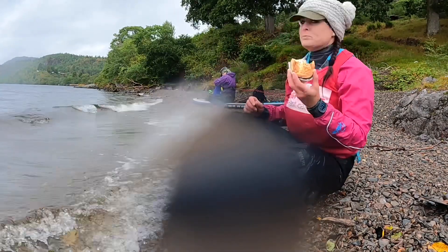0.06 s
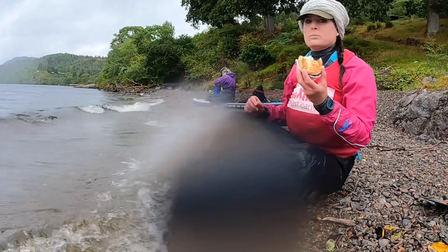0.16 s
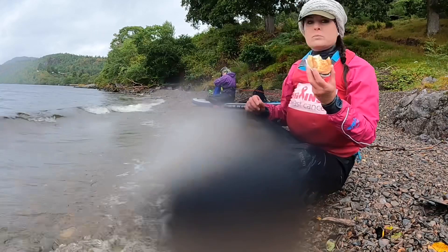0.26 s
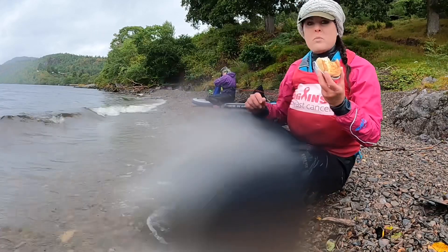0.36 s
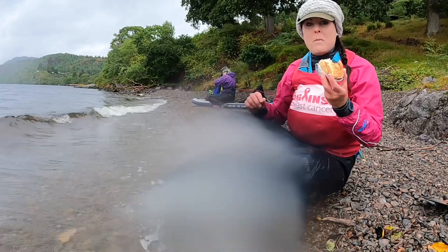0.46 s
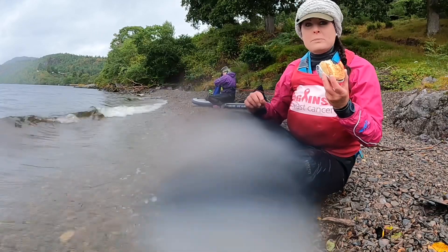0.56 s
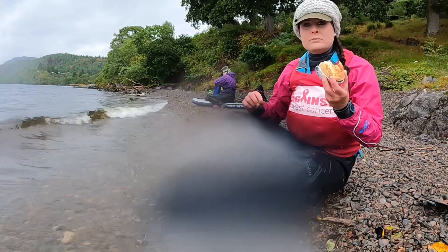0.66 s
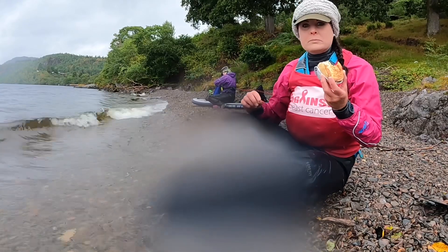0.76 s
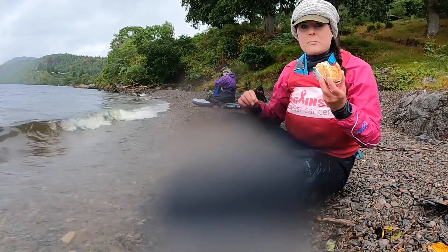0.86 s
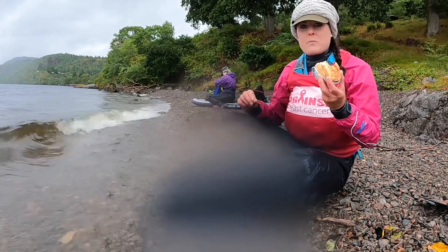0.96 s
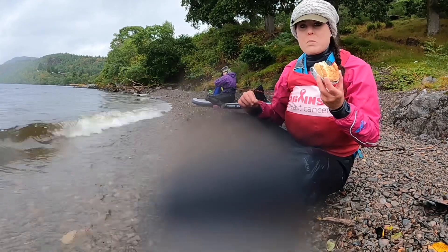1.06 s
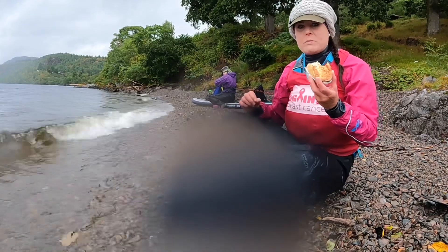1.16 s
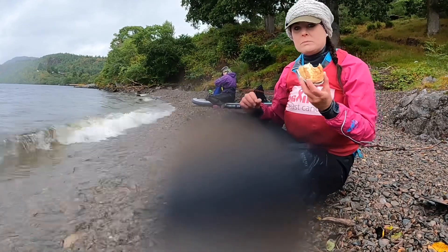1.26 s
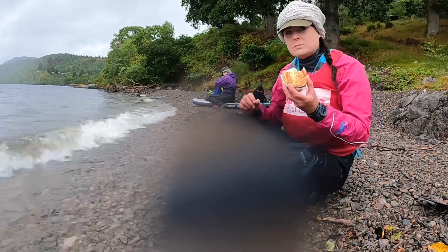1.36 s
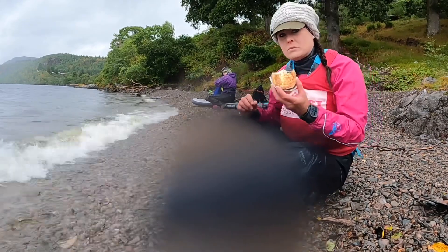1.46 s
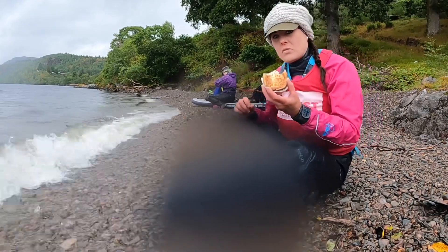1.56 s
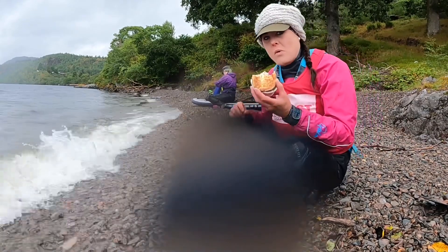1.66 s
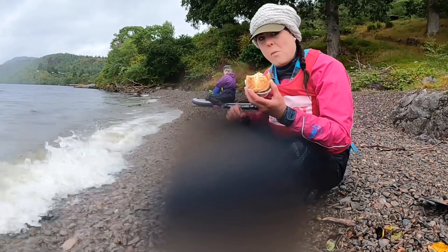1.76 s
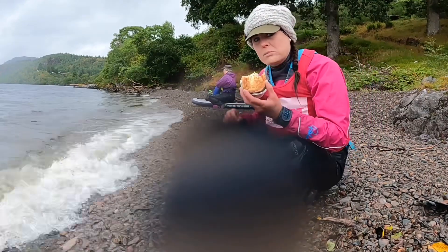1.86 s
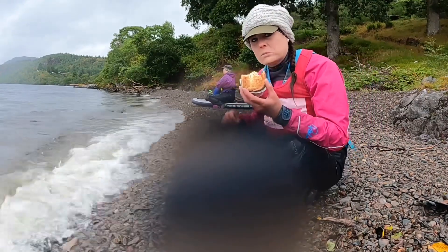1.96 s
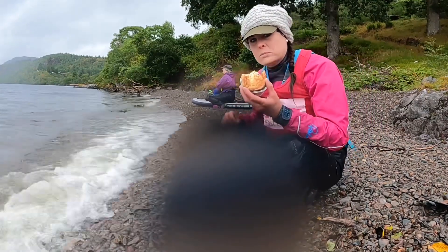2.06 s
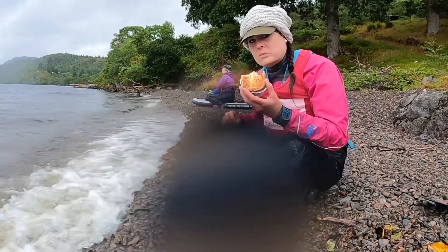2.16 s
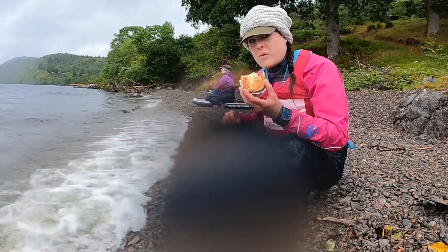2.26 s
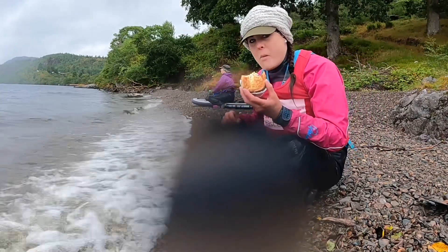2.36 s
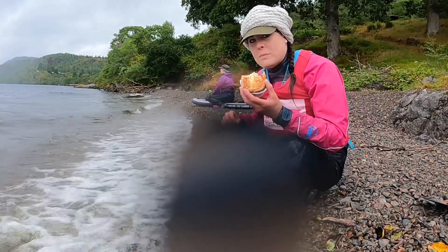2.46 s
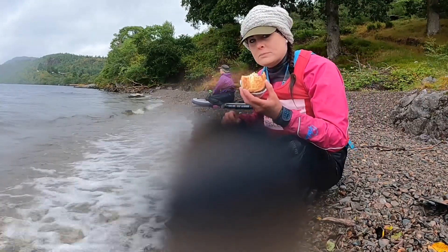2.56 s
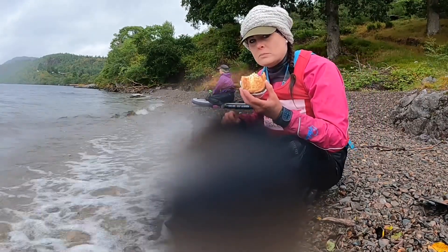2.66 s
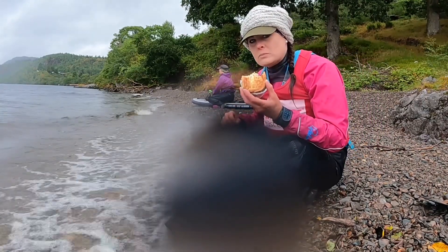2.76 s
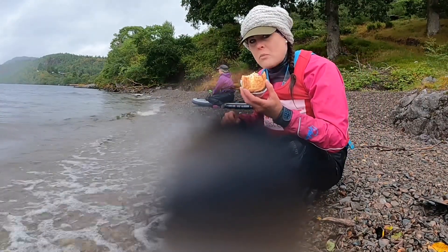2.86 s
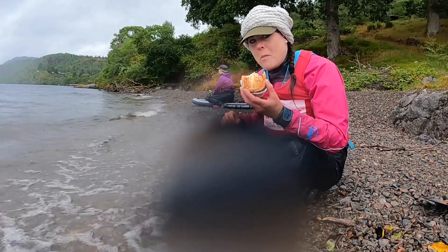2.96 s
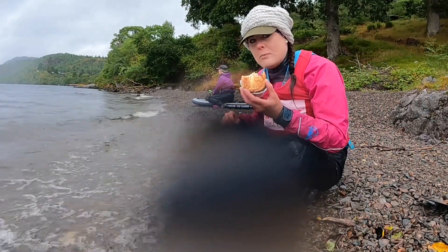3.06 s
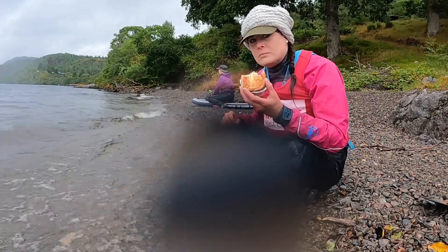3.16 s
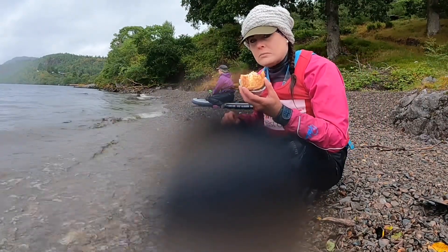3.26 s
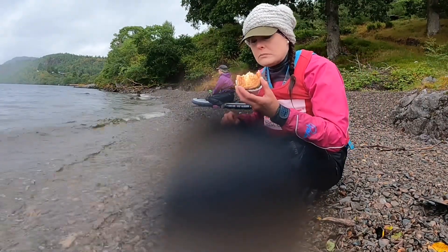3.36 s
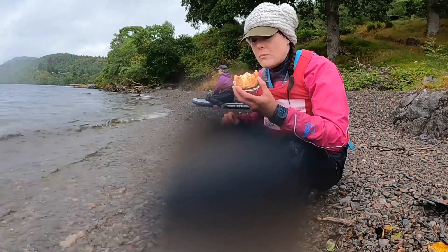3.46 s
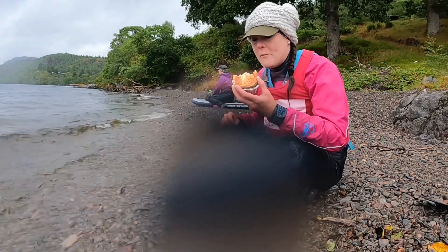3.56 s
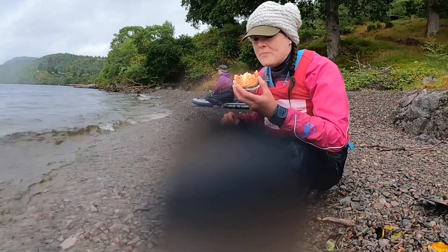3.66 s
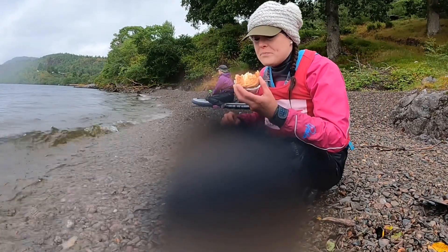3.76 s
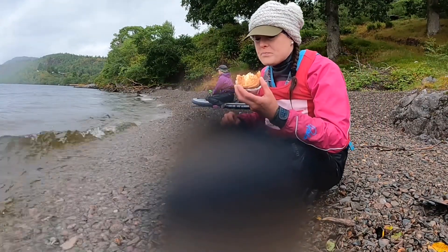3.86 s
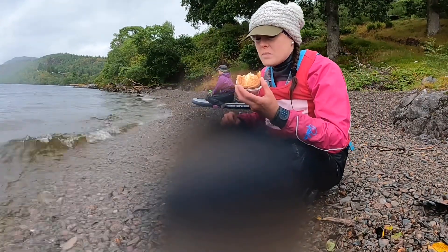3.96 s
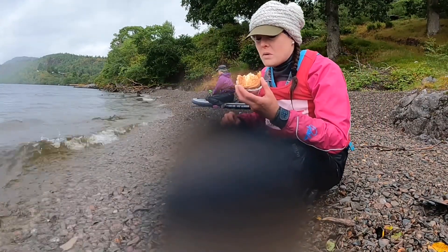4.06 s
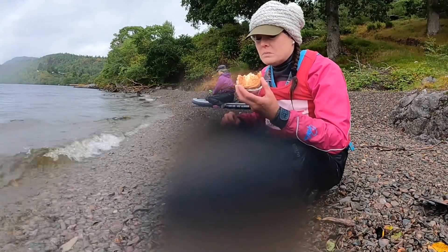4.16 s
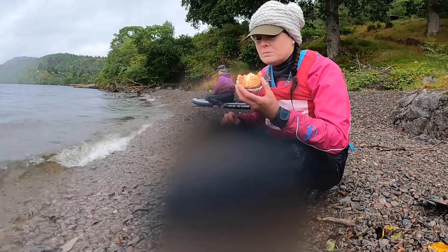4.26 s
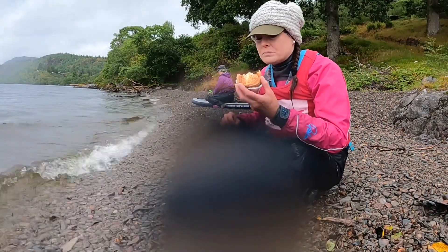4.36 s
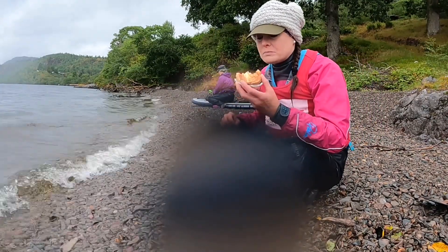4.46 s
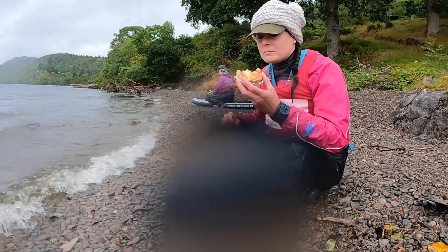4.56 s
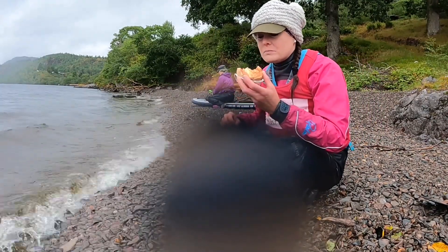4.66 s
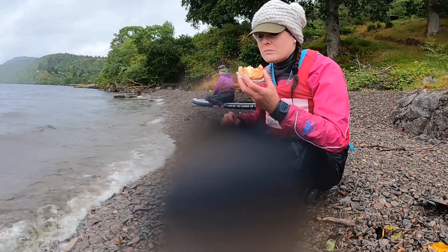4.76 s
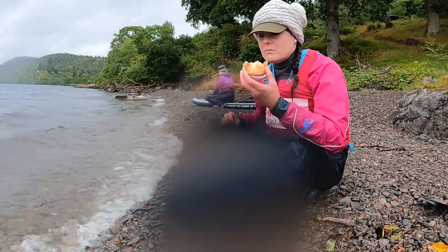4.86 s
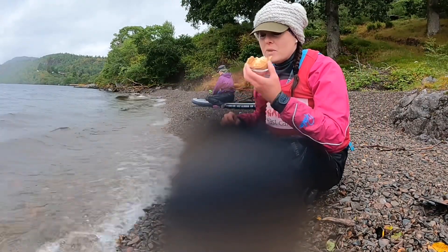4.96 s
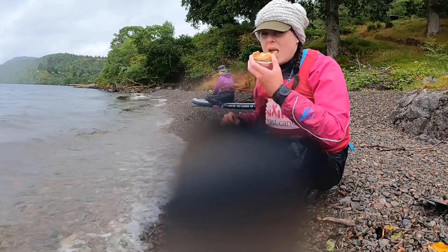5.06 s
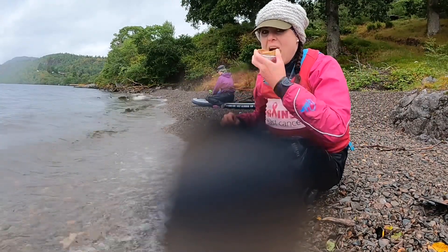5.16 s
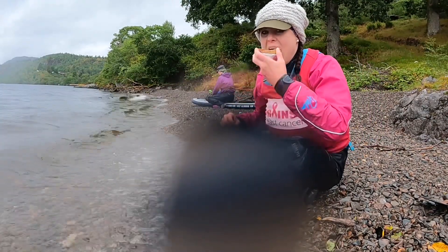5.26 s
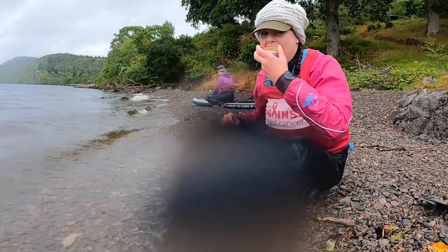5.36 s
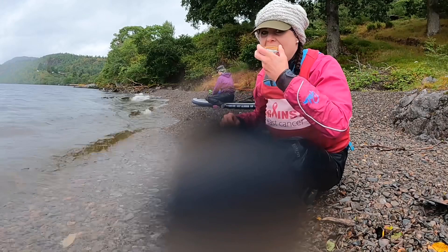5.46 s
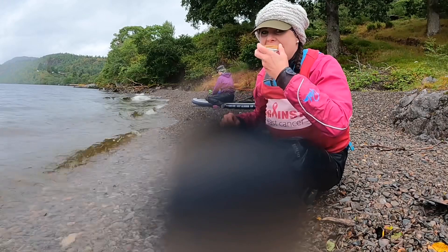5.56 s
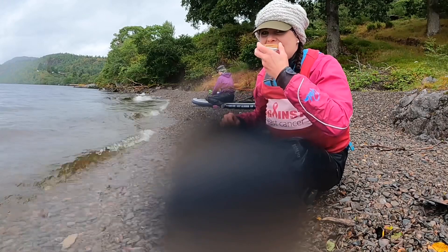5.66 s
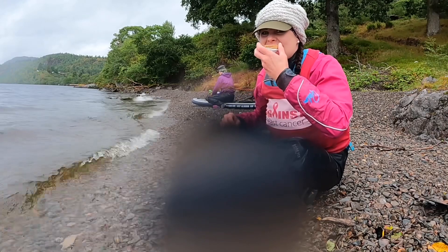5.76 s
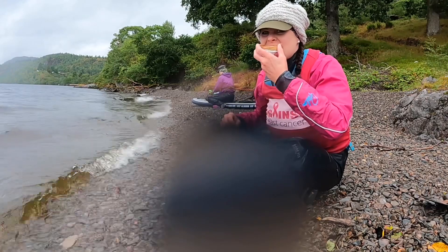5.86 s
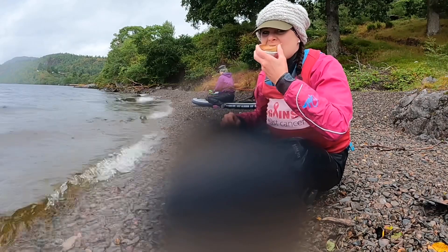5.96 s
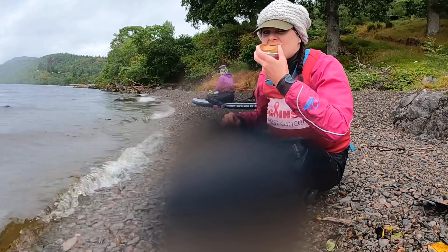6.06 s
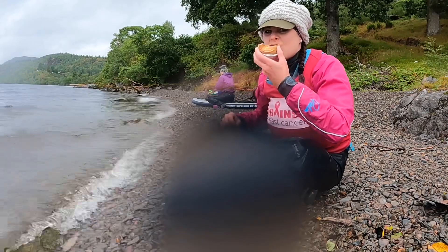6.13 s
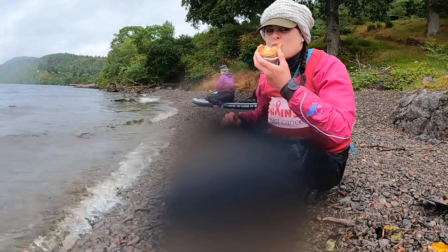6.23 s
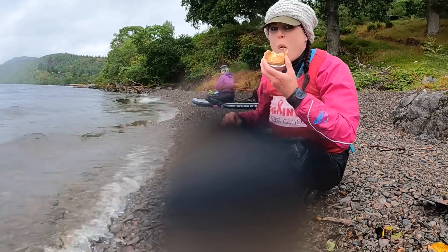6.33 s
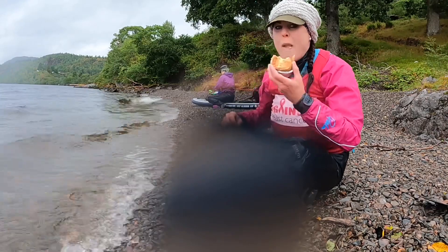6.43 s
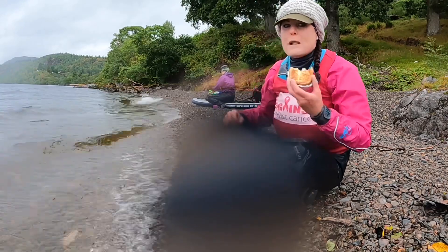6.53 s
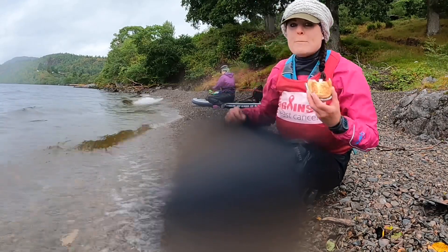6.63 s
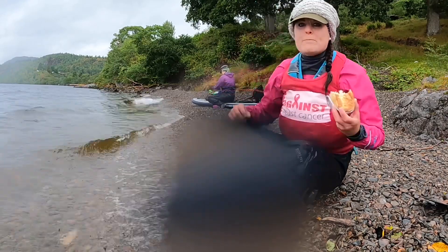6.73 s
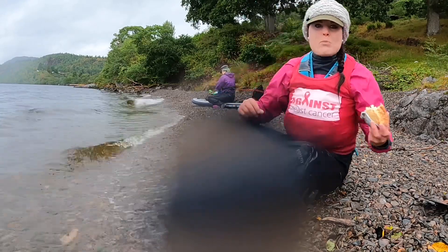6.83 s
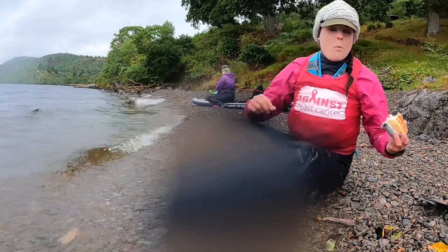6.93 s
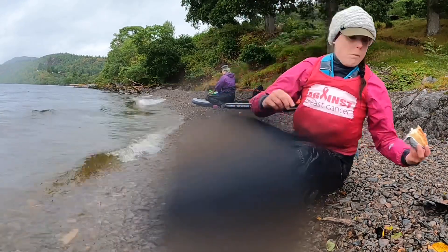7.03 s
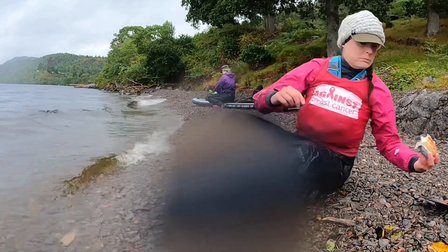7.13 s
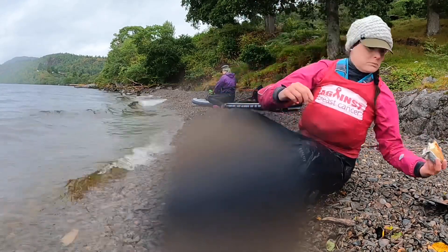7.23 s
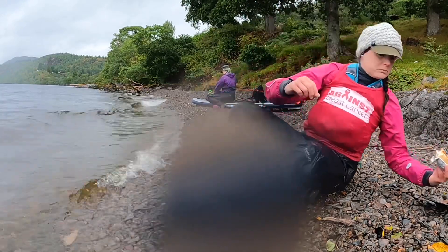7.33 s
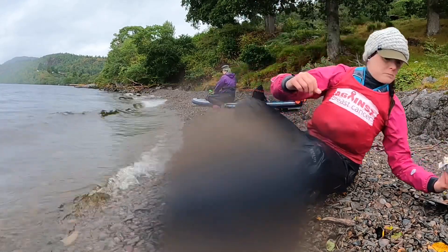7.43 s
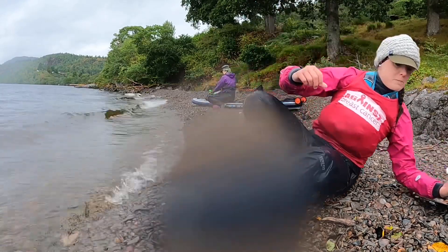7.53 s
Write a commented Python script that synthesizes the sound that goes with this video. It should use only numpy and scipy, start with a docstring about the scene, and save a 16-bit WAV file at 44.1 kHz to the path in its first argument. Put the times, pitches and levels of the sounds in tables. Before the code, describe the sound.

Small waves wash over a pebble lakeshore in muffled, bubbling surges, strong at first, then lulling and returning with plops and brief knocks.

```python
"""Waves on a pebble lakeshore

Small wind-driven waves break on pebbles, heard through a wet, muffling microphone cover.
Wind, thuds and distant waves are shaped noise; air pockets, foam and fizz mix ringing bubbles with noise.
Single plops, slaps and gurgles are gliding tones; spray is thin high crackle; pebbles knock and ring.
"""
import sys
import numpy as np
from scipy import signal
from scipy.fft import rfft, irfft, next_fast_len
from scipy.io import wavfile

SR = 44100
rng = np.random.default_rng(int(sys.argv[2]) if len(sys.argv) > 2 else 0)


def inscribe(sig):
    """Save sig as 16-bit PCM at rate SR to the path in sys.argv[1].

    A 1-D sig is mono; a 2-D sig holds one channel per row.
    Samples are clipped to [-1, 1] before scaling.
    """
    pcm = np.round(np.clip(np.atleast_2d(sig).T, -1, 1) * 32767)
    wavfile.write(sys.argv[1], SR, pcm.astype(np.int16))


N = 334719

# colour of the surf behind the cover, relative: freq_hz, density_db_per_hz
COVER_COLOUR = [(15, -33.5), (30, -8.5), (70, -7), (150, 2), (424, -1.5), (589, 1), (1230, -4.5),
                (1430, -6.5), (2000, -19), (2900, -29.5), (3300, -31.5), (4150, -45.5), (6300, -54.5),
                (8160, -69.5), (9900, -92.5), (22000, -120)]
# gusts on the microphone: start_s, level_db
WIND_GUSTS = [(0.0, -54), (0.53, -47), (0.93, -31.5), (1.52, -44), (2.01, -35.5), (2.45, -46),
              (3.78, -52.5), (5.12, -48), (5.22, -41), (5.26, -47), (6.24, -58.5), (6.42, -50.5),
              (7.5, -49.5), (7.59, -41)]
# white water, controls of the range levels: start_s, foam_db, fizz_vs_foam_db, thud_vs_foam_db
WASH_CONTROLS = [(0.0, -22.5, -19.5, -14.5), (0.27, -19.5, -22, -17), (0.6, -21.5, -22.5, -19.5),
                 (0.95, -22.5, -20, -18), (1.3, -23.5, -17.5, -7), (1.65, -19.5, -19.5, -5.5),
                 (2.15, -21, -22, -3.5), (2.4, -25.5, -21, -15), (2.9, -27.5, -27, -7),
                 (3.2, -30.5, -33, -16), (3.4, -36.5, -24.5, -22), (3.6, -45, -13.5, -13),
                 (3.87, -46, -11, -14), (4.08, -40, -10, -17), (4.27, -29.5, -17, -20),
                 (4.62, -30.5, -18, -26), (4.95, -24, -17.5, -22.5), (5.3, -22.5, -20, -33),
                 (5.6, -29.5, -20.5, -22.5), (6.15, -30.5, -20.5, -22), (6.45, -30, -19, -26),
                 (6.6, -30.5, -21.5, -25), (6.93, -34.5, -14.5, -12.5), (7.27, -33, -15, -17.5),
                 (7.59, -36, -13.5, -12)]
# air trapped under the breaker: start_s, level_db
AIR_POCKETS = [(0.0, -32), (0.25, -29), (1.1, -26.5), (1.7, -22.5), (2.16, -25.5), (2.42, -33),
               (3.05, -33.5), (3.36, -52.5), (4.08, -49.5), (4.27, -36.5), (4.8, -39.5), (5.15, -33),
               (5.4, -39), (5.9, -38), (6.3, -40.5), (6.52, -45), (7.08, -41), (7.44, -43), (7.59, -43)]
# finest bubbles: start_s, level_db
HISS_LEVEL = [(0.0, -66.5), (0.38, -63.5), (0.71, -68), (1.7, -62), (2.05, -63), (2.43, -69), (2.85, -72),
              (3.59, -78), (4.2, -72), (4.68, -68), (4.91, -64), (5.12, -65), (5.5, -74), (6.15, -73),
              (6.5, -68), (6.85, -73.5), (7.59, -75)]
# scale on the power share of distinct bubbles against the roar: start_s, scale_0_to_1
BUBBLE_SHARE = [(0, 0.34), (1.2, 0.35), (2.2, 0), (3.2, 0.08), (4.2, 0.62), (5.2, 0.39), (6.2, 0.96),
                (7.59, 0.04)]
# waves farther along the shore, relative: freq_hz, density_db_per_hz
FAR_COLOUR = [(15, -24), (30, -10), (70, -9.5), (105, -22), (160, 0.5), (300, -20), (600, -12),
              (1250, -11.5), (2400, -39), (3300, -41), (4150, -46), (6500, -59), (9900, -95), (22000, -125)]
# spray: start_s, level_db
SPRAY_LEVEL = [(0.0, -64), (0.27, -57.5), (0.4, -63), (0.74, -69), (0.85, -103), (1.5, -105), (2.12, -66.5),
               (2.33, -62), (2.5, -68), (3.3, -76), (3.65, -79), (4.15, -72.5), (4.28, -71), (4.66, -66.5),
               (4.9, -59.5), (5.15, -60), (5.4, -69.5), (5.77, -75), (6.19, -72.5), (6.55, -68.5),
               (6.85, -74), (7.59, -75)]
# colour of the spray, relative: freq_hz, density_db_per_hz
SPRAY_SPECTRUM = [(5880, -86), (10000, -59.5), (10300, -43.5), (11100, -18.5), (12000, 1), (13200, 0),
                  (15600, -13)]
# spray drops landing: start_s, level_db (before the band-pass)
SPRAY_DROPS = [(0.2049, -52), (0.2548, -43), (2.3521, -48), (2.4054, -49), (2.5526, -48.5), (3.6745, -46),
               (4.2832, -44), (4.35, -45), (4.4927, -49), (5.025, -46), (5.1193, -33), (5.1567, -47),
               (5.2345, -55), (5.2689, -51), (5.9484, -58), (6.2208, -40), (6.3026, -46), (6.3964, -44),
               (6.5046, -45), (6.54, -52), (6.6777, -49), (6.8389, -48), (7.1387, -49)]
# single bubbles: peak_s, peak_db, pitch_hz
SINGLE_BUBBLES = [(0.252, -16, 1141), (0.826, -17.5, 199), (1.024, -16.5, 115), (2.171, -14.5, 252),
                  (3.061, -29, 254), (4.163, -30, 1590), (4.18, -30, 276), (4.192, -36, 875),
                  (4.288, -31, 970), (4.25, -22.5, 473), (4.278, -23.5, 228), (4.36, -23, 825),
                  (4.53, -24, 900), (4.564, -21, 1120), (4.686, -20.5, 291), (4.751, -23.5, 357),
                  (4.76, -22.5, 260), (4.81, -25, 246), (4.832, -17, 1290), (4.903, -19, 523),
                  (4.951, -17, 880), (4.977, -17.5, 217), (4.979, -16, 740), (5.011, -25, 770),
                  (5.174, -18.5, 181), (5.237, -15.5, 1080), (5.24, -22, 738), (5.316, -17.5, 1264),
                  (5.32, -14, 700), (5.35, -28, 474), (5.354, -19.5, 1360), (5.728, -23, 1160),
                  (5.954, -24.5, 570), (6.103, -23, 292), (6.235, -21.5, 318), (6.3, -24, 940),
                  (6.539, -24, 467), (6.625, -18.5, 875), (6.689, -22, 1220), (6.888, -26.5, 1180),
                  (6.933, -28, 1360), (6.96, -26.5, 904), (6.994, -23, 814), (7.072, -24, 547),
                  (7.086, -27, 1170), (7.245, -23.5, 940), (7.341, -25, 477), (7.361, -30, 978),
                  (7.429, -30, 1370), (7.519, -22, 534)]
# pebbles knocking together: start_s, ring_db, pitch_hz
PEBBLE_KNOCKS = [(3.14, -55, 3900), (3.41, -65, 4600), (3.8, -60, 4500), (4.1, -50, 2600),
                 (6.2215, -37.5, 3160), (6.221, -53, 4900), (6.621, -55, 5700), (7.247, -62, 5200),
                 (7.253, -54, 3000), (7.418, -60, 4800), (7.47, -60, 4200)]
# water slapping a stone: peak_s, peak_db, pitch_hz
STONE_SLAPS = [(3.732, -27.5, 914), (3.917, -26, 914), (6.2218, -12, 900), (6.431, -26, 800),
               (6.4402, -13.5, 580), (6.472, -24, 710), (6.7337, -18.5, 1050)]
# air pockets wobbling between stones: start_s, length_s, pitch_hz, start_db, end_db
GURGLE_EVENTS = [(6.233, 0.1, 270, -24, -28.5), (6.401, 0.08, 284, -31, -29)]

WIND_TOP_HZ, THUD_TOP_HZ, POCKET_TOP_HZ = 73, 162, 414
COARSE_TOP_HZ, FOAM_TOP_HZ, FIZZ_TOP_HZ, HISS_TOP_HZ = 900, 1943, 3900, 11000
MEAN_FOAM_DB, FAR_DB = -28, -48
PATCHY_DB, PATCHY_HZ = 0.74, 10.0  # each range drifts alone
SHARED_DB, SHARED_HZ = 0.77, 25.0  # upper ranges drift together
CUTOFF_HZ = 15760


def from_db(db):
    """dB to gain."""
    return 10 ** (np.asarray(db) / 20)


def rms_one(x):
    """Scale to rms 1."""
    return x / np.sqrt(np.mean(x ** 2) + 1e-20)


def in_time(rows):
    """Columns of a curve table, one value per sample."""
    time_s, *columns = np.transpose(rows)
    return [np.interp(np.arange(N) / SR, time_s, column) for column in columns]


def drift(corner_hz):
    """Slow chance: noise at every 40th sample through a double one-pole low-pass; spread 1."""
    pole = np.exp(-80 * np.pi * corner_hz / SR)
    noise = rng.standard_normal(N // 40 + 2002)
    slow = signal.lfilter([1], [1, -2 * pole, pole * pole], noise)[2000:]  # settled part
    return np.interp(np.arange(N) / 40, np.arange(len(slow)), rms_one(slow))


def coloured(x, spectrum, low_hz, high_hz):
    """Lay a spectrum on x between soft edges whose powers add up across neighbours; rms 1."""
    size = next_fast_len(N)
    hz = np.arange(size // 2 + 1) * SR / size + 1e-3
    points_hz, points_db = np.array(spectrum).T
    gain = from_db(np.interp(np.log(hz), np.log(points_hz), points_db))
    edges = 1 / np.sqrt((1 + (low_hz / hz) ** 10) * (1 + (hz / high_hz) ** 10))
    return rms_one(irfft(rfft(x, size) * gain * edges, size)[:N])


def random_sizes(spread_db, limit):
    """Skewed chance amplitudes of either sign, one per sample."""
    size_db = spread_db * np.minimum(rng.exponential(1, N), limit)
    return from_db(size_db) * rng.choice([-1, 1], N)


def rush(flicker_db, corner_hz):
    """Bubbles too many to tell apart: noise whose level flickers."""
    return rng.standard_normal(N) * from_db(flicker_db * drift(corner_hz))


def blend(grains, noise, share):
    """Mix two rms-1 layers by share of power."""
    share = np.clip(share, 0, 1)
    return np.sqrt(share) * grains + np.sqrt(1 - share) * noise


def add(out, start_s, shape):
    """Lay a short sound into the track."""
    i = round(start_s * SR)
    out[i:i + len(shape)] += shape[:N - i]


def wind():
    """Gusts press on the microphone: flickering low rumble."""
    level_db, = in_time(WIND_GUSTS)
    return from_db(level_db) * coloured(rush(1.7, 6.0), COVER_COLOUR, 8, WIND_TOP_HZ)


def wash_db(offset_db, foam, bright, weight):
    """Level of one range in dB, a weighted sum of the wash controls."""
    foam_db, bright_db, weight_db = in_time(WASH_CONTROLS)
    swing_db = foam * (foam_db - MEAN_FOAM_DB)
    return MEAN_FOAM_DB + offset_db + swing_db + bright * bright_db + weight * weight_db


def thud():
    """Weight of the surge: flickering noise just above the wind."""
    level_db = wash_db(0.1, foam=0.95, bright=0.01, weight=1.05)
    return from_db(level_db) * coloured(rush(1.4, 5.5), COVER_COLOUR, WIND_TOP_HZ, THUD_TOP_HZ)


def bubbles(low_hz, high_hz, per_s, cycles, spread_db, clump_db, count):
    """Bubbles are born at random in clumps; each rings at one of count pitches, -60 dB after cycles."""
    sizes = random_sizes(spread_db, 4)
    born = rng.random(N) < per_s * from_db(clump_db * drift(9.0)) / SR
    pitch_index = rng.integers(0, count, N)
    out = np.zeros(N)
    for k, hz in enumerate(np.geomspace(low_hz, high_hz, count)):
        pole = from_db(-60 * hz / (cycles * SR))
        w = 2 * np.pi * hz / SR
        clicks = sizes * born * (pitch_index == k) * hz + 1e-18  # even power per Hz over the pitches
        out += signal.lfilter([0, np.sin(w)], [1, -2 * pole * np.cos(w), pole * pole], clicks)
    return rms_one(out)


def white_water():
    """Air pockets, foam, fizz and hiss: ringing bubbles against a shared roar, range by range."""
    bubble_share, = in_time(BUBBLE_SHARE)
    pocket_db, = in_time(AIR_POCKETS)
    hiss_db, = in_time(HISS_LEVEL)
    splash_db = SHARED_DB * drift(SHARED_HZ)
    coarse_db = wash_db(-8.5, foam=0.79, bright=-0.1856, weight=0.0044) + 0.4 * splash_db
    fine_db = wash_db(0.84, foam=0.9, bright=0.32, weight=-0.025) + 0.41 * splash_db
    fizz_db = wash_db(0.11, foam=0.97, bright=1, weight=0.0085) + splash_db

    pockets = bubbles(125, 452, per_s=120, cycles=22, spread_db=2.5, clump_db=2.5, count=14)
    foam = bubbles(300, 2442, per_s=1000, cycles=37, spread_db=3.86, clump_db=2.5, count=30)
    fizz = bubbles(1500, 9000, per_s=1800, cycles=40, spread_db=4.5, clump_db=1.5, count=40)
    roar = rush(0.76, 23.0)
    # low_hz, high_hz, level_db, bubbles, largest bubble share
    ranges = [(THUD_TOP_HZ, POCKET_TOP_HZ, pocket_db, pockets, 0.6),
              (POCKET_TOP_HZ, COARSE_TOP_HZ, coarse_db, foam, 0.85),
              (COARSE_TOP_HZ, FOAM_TOP_HZ, fine_db, foam, 0.75),
              (FOAM_TOP_HZ, FIZZ_TOP_HZ, fizz_db, fizz, 0.4),
              (FIZZ_TOP_HZ, HISS_TOP_HZ, hiss_db + splash_db, fizz, 0.25)]
    out = np.zeros(N)
    for low_hz, high_hz, level_db, grains, share in ranges:
        grain_band = coloured(grains, COVER_COLOUR, low_hz, high_hz)
        roar_band = coloured(roar, COVER_COLOUR, low_hz, high_hz)
        patchy_db = level_db + PATCHY_DB * drift(PATCHY_HZ)
        out += from_db(patchy_db) * blend(grain_band, roar_band, share * bubble_share)
    return out


def far_waves():
    """Waves farther along the shore merge into noise at a nearly steady level."""
    return from_db(FAR_DB) * coloured(rush(0.44, 2.7), FAR_COLOUR, 8, HISS_TOP_HZ)


def spray_hiss():
    """Tiny drops land at random in flurries over fine noise, in a thin high band."""
    level_db, = in_time(SPRAY_LEVEL)
    landed = rng.random(N) < 450 * from_db(3.0 * drift(14.0)) / SR
    drops = random_sizes(3.2, 3.5) * landed
    hiss = blend(rms_one(drops), rush(2.2, 30.0), 0.5)
    return from_db(level_db) * coloured(hiss, SPRAY_SPECTRUM, 9000, 19000)


def spray_ticks():
    """The largest drops: noise bursts falling 60 dB in 6 ms, band-passed."""
    t = np.arange(round(0.008 * SR)) / SR
    out = np.zeros(N)
    for start_s, level_db in SPRAY_DROPS:
        burst = rng.standard_normal(len(t)) * from_db(-60 * t / 0.006)
        add(out, start_s, from_db(level_db) * burst)
    band = signal.butter(8, [11300, 15200], "band", fs=SR, output="sos")
    return signal.sosfilt(band, out + 1e-18)


def single_bubbles(rows, ms_at_800_hz, swell, rise=0.11, fade=0.43):
    """A bubble swells in, then dies as its pitch climbs toward the surface; low ones last longer."""
    out = np.zeros(N)
    for peak_s, peak_db, hz in rows:
        length_s = ms_at_800_hz / 1000 * (800 / hz) ** 0.65
        u = np.arange(round(3 * length_s * SR)) / (length_s * SR) - swell  # in lengths, 0 at the peak
        swelling = np.cos(np.pi / 2 * u / swell) ** 2
        dying = np.exp(-(np.abs(u) / fade) ** 1.4)
        shape = np.where(u < 0, swelling, dying)
        tone = np.sin(2 * np.pi * np.cumsum(hz * (1 + rise * u)) / SR)
        add(out, peak_s - swell * length_s, from_db(peak_db) * shape * tone)
    return out


def plops():
    """Single bubbles plop out of the wash with a soft swell."""
    return single_bubbles(SINGLE_BUBBLES, ms_at_800_hz=13.03, swell=0.3456)


def knocks(ring_t60_s=0.016, crack_t60_s=0.008, crack_db=8.0):
    """Pebbles collide: a short stony ring over a crack of noise at and below its pitch."""
    out = np.zeros(N)
    t = np.arange(round(0.03 * SR)) / SR
    for start_s, ring_db, hz in PEBBLE_KNOCKS:
        noise = rng.standard_normal(len(t)) * from_db(-60 * t / crack_t60_s)
        band = signal.butter(2, [0.55 * hz, 0.99 * hz], "band", fs=SR, output="sos")
        crack = from_db(crack_db) * signal.sosfilt(band, noise)
        attack = np.minimum(t / 0.0006, 1)
        ring = from_db(-60 * t / ring_t60_s) * attack * np.sin(2 * np.pi * hz * t)
        add(out, start_s, from_db(ring_db) * (ring + crack))
    cover = signal.butter(8, 6600, fs=SR, output="sos")  # the cover dulls the top
    return signal.sosfilt(cover, out + 1e-18)


def slaps():
    """Water slaps a stone: a shorter bubble with a harder start."""
    return single_bubbles(STONE_SLAPS, ms_at_800_hz=8.6, swell=0.15)


def gurgles(edge_s=0.011, sag_db=9.5, bend=0.11):
    """A near sine weakens and climbs while the air pocket is squeezed, then comes back."""
    out = np.zeros(N)
    for start_s, length_s, hz, start_db, end_db in GURGLE_EVENTS:
        t = np.arange(round(length_s * SR)) / SR
        squeeze = np.sin(np.pi * t / length_s) ** 2
        edges = np.clip(np.minimum(t, length_s - t) / edge_s, 0, 1)
        level_db = start_db + (end_db - start_db) * t / length_s - sag_db * squeeze
        tone = np.sqrt(2) * np.sin(2 * np.pi * np.cumsum(hz * (1 + bend * squeeze)) / SR)
        add(out, start_s, from_db(level_db) * edges * tone)
    return out


def scene():
    """The shore at one microphone."""
    surf = wind() + thud() + white_water() + far_waves()
    spray = spray_hiss() + spray_ticks()
    return (surf + spray + plops() + knocks() + slaps() + gurgles())[None]


def record(dry):
    """Fade in over 3 ms; a steep low-pass cuts the top."""
    opening = np.minimum(np.arange(N) / (0.003 * SR), 1)
    low_pass = signal.ellip(18, 0.5, 75, CUTOFF_HZ, fs=SR, output="sos")
    return signal.sosfilt(low_pass, dry * opening)


dry = scene()
out = record(dry)
inscribe(out)
```